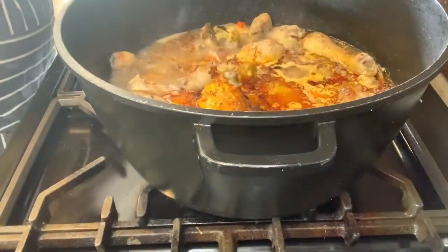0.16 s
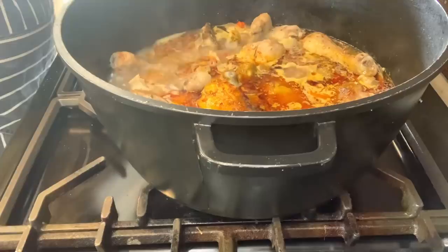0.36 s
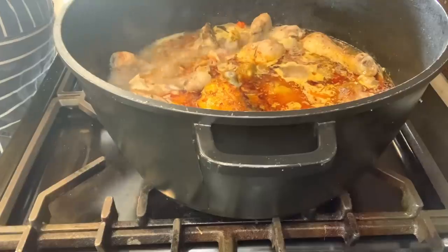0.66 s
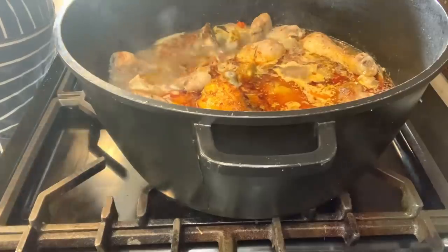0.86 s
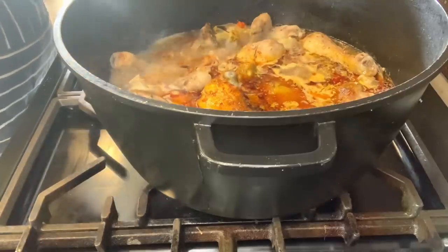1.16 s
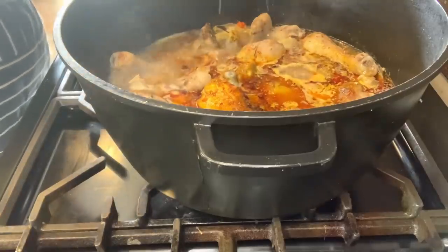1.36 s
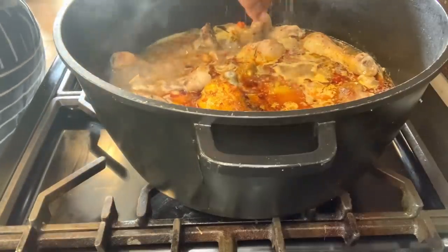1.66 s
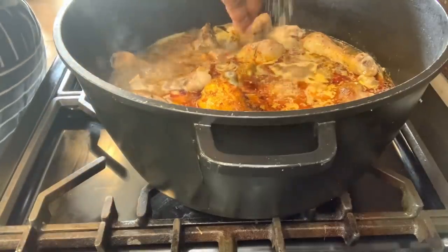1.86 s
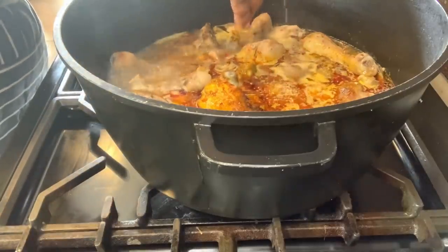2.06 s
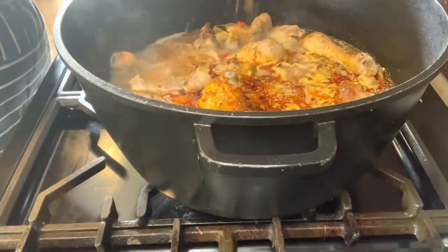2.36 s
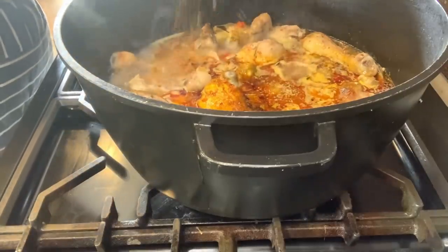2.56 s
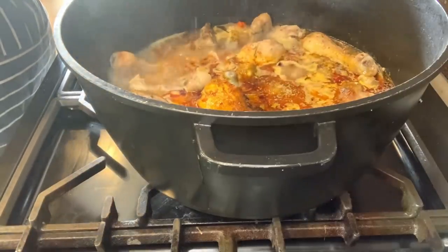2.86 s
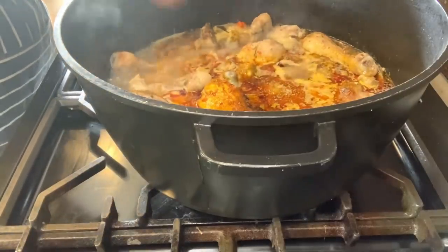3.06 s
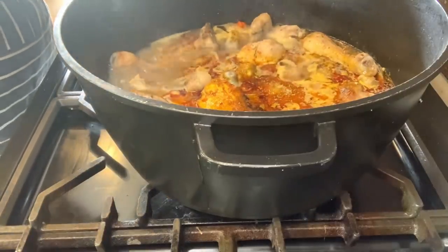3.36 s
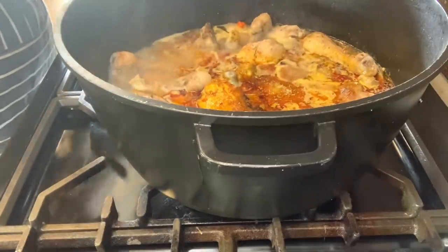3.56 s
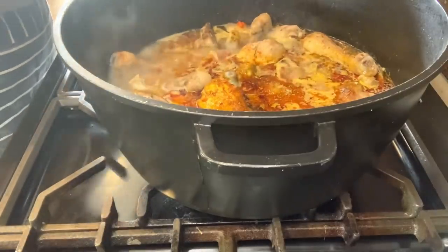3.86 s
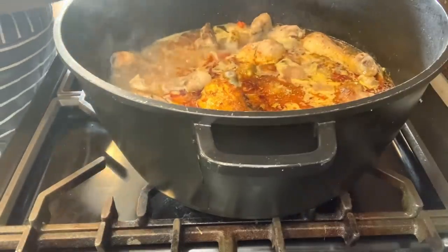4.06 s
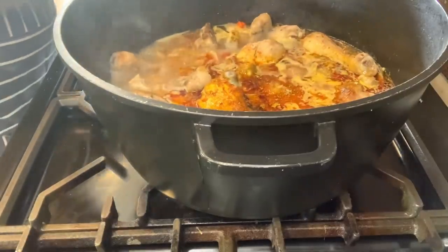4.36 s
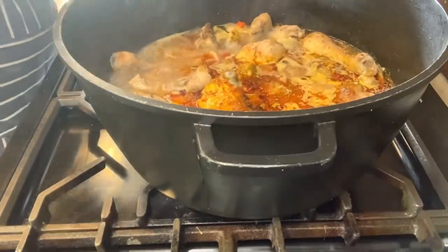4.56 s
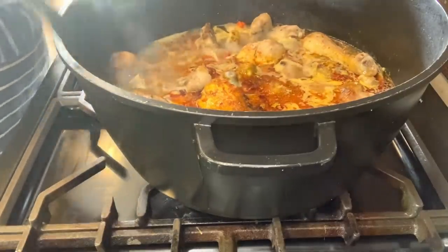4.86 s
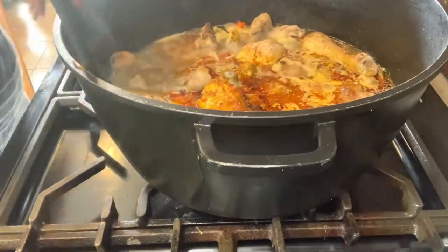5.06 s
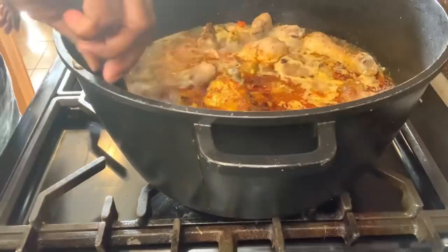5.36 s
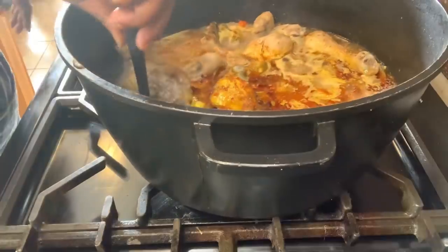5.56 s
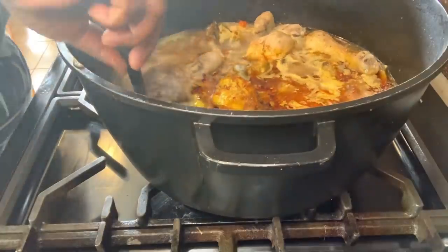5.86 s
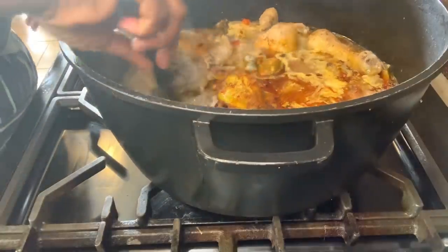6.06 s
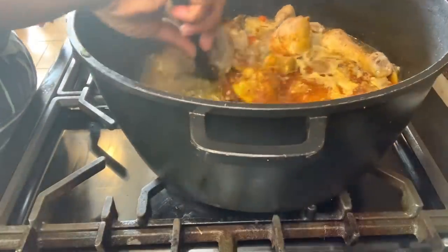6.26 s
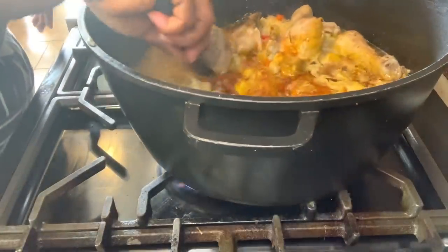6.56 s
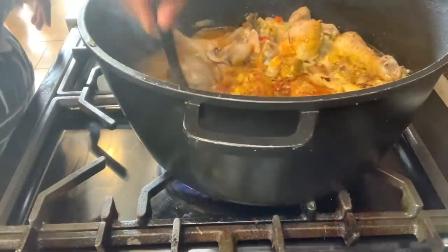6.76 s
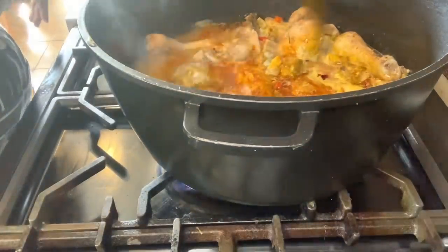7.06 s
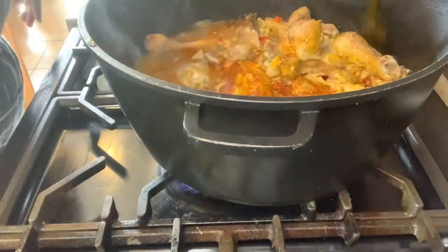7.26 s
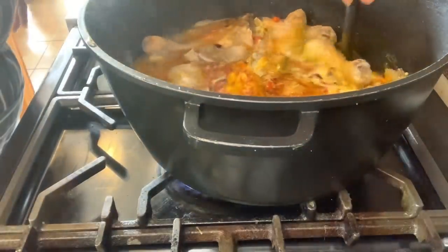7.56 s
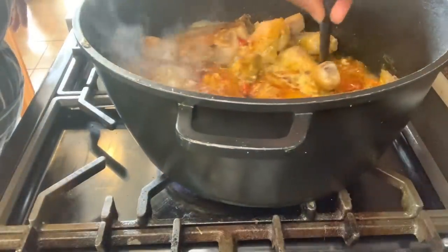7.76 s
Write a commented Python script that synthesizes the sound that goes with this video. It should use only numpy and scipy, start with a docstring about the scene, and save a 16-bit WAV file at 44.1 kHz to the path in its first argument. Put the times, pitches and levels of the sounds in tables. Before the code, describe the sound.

Close stereo pickup of a chicken stew simmering on a gas stove in a small kitchen. Flame hiss, low rumble and a faint steady hum run throughout, with tiny bubbles popping. Around the middle a jar is set down with a short dull clatter and bubbles thicken. Later a spoon ticks, drags dully through the stew, thuds softly and knocks the pot sharply, followed by a few light ticks.

```python
"""In a kitchen, a pot of soup simmers on a gas burner, close to a two-port microphone.
The gas jets are coloured noise, hissing over a low rumble; a hum and thin tones are wavering sines.
Bubbles are short rings that rise in pitch. A jar set down and a spoon knocking the pot ring many pitches.
The spoon also ticks, and scrapes through the stew as noisy slips; thuds are a few low cycles.
Rustles are grainy bursts, and the kitchen answers the jar, spoon, ticks and bubbles with an echo."""
import sys
import numpy as np
from scipy import signal
from scipy.io import wavfile
from scipy.ndimage import uniform_filter1d

SR = 44100
rng = np.random.default_rng(int(sys.argv[2]) if len(sys.argv) > 2 else 0)


def pcm_store(signal):
    """Save signal as 16-bit PCM."""
    levels = np.round(np.clip(np.atleast_2d(signal), -1, 1) * 32767)
    wavfile.write(sys.argv[1], SR, levels.astype(np.int16).T)


N = 348831  # length in samples


def amp(db):
    """Turns a level in dB into a gain."""
    return 10 ** (np.asarray(db) / 20)


def evened(x):
    """Scales a signal to an rms of 1."""
    return x / np.sqrt(np.mean(x ** 2) + 1e-20)


def read(points, hz):
    """Reads a table between its points, on a log-frequency axis."""
    f, value = np.transpose(points)
    return np.interp(np.log(hz + 1), np.log(f + 1), value)


def add(mix, s, sound, pan_db):
    """Places a sound in both ports at a time in s; pan is left minus right in dB."""
    part = mix[:, round(s * SR):][:, :sound.shape[-1]]
    part += amp([[pan_db / 2], [-pan_db / 2]]) * sound[..., :part.shape[1]]


def drift(rate_hz):
    """Slow random wander of rms 1: sines up to the given rate, the slower ones stronger."""
    t = np.arange(0, N, 64) / SR
    hz = np.geomspace(rate_hz / 20, rate_hz, num=24)[:, None]
    start = rng.random((24, 1))
    wander = (np.sin(2 * np.pi * (hz * t + start)) / np.sqrt(hz)).sum(0)
    return np.interp(np.arange(N) / SR, t, evened(wander))


def band(x, low_hz, high_hz):
    """Keeps one band of a sound, at rms 1."""
    edges = [low_hz, min(high_hz, SR / 2.1)]
    return evened(signal.sosfilt(signal.butter(2, edges, "band", fs=SR, output="sos"), x))


GRIT_ALIKE = 0.6  # likeness of click noise in the two ports, 0-1


def grit(count):
    """Noise for a click, only partly alike in the two ports."""
    a, b = rng.standard_normal((2, count))
    return np.array([a, GRIT_ALIKE * a + np.sqrt(1 - GRIT_ALIKE ** 2) * b])


# low rumble of the kitchen, alike in both ports: (f/Hz, level/dB per Hz)
RUMBLE_COLOUR = [(30, -100), (35, -74), (42, -66.5), (62, -70), (84, -74.5), (110, -70), (130, -66.5),
                 (142, -73), (170, -67), (186, -69.5), (208, -74), (222, -75), (238, -82.5), (262, -70.5),
                 (292, -70.5), (338, -82), (385, -80), (397, -91), (412, -75.5), (450, -93)]
# flame and gas jets before the stove's boost, the part alike in both ports: (f/Hz, level/dB per Hz)
HISS_ALIKE_COLOUR = [(330, -100), (450, -88), (1200, -89.5), (2200, -88.5), (3200, -94.5), (4200, -97),
                     (5500, -100), (6300, -92), (7600, -103.5), (8250, -132), (9500, -135), (10300, -99.5),
                     (10500, -95), (12500, -91.5), (13560, -91), (15700, -91)]
# the part of opposite sign in the two ports, before the boost: (f/Hz, level/dB per Hz)
HISS_OPPOSITE_COLOUR = [(30, -99), (120, -82), (400, -85.5), (1200, -90), (2200, -89.5), (3200, -94),
                        (4500, -97.5), (5500, -95), (6700, -92.5), (8000, -95), (9600, -93), (10400, -91),
                        (13000, -99), (13200, -135)]
# resonances of burner, pot and stove top: (f/Hz, width/Hz, boost/dB at blend 0, boost/dB at blend 1)
STOVE_RESONANCES = [(400, 37, 0.5, 5.5), (690, 110, 0.5, 3), (883, 91, 2.9, 4.5), (988, 18, 3.5, 9.5),
                    (1530, 168, 5.6, 5.5), (1642, 74, 3.1, 5.5), (1728, 35, 5.5, 5.5), (2150, 61, 3.3, 2),
                    (2840, 47, 4, 1.5), (3615, 70, 11, 6), (3658, 156, 5.5, 4), (3760, 90, 6, 6),
                    (4770, 440, 2.3, 3.5), (6990, 170, 11, 4.8), (7260, 300, 10, 9), (8680, 420, 14, 9),
                    (9200, 300, 8, 7), (9850, 450, 8, 7), (13180, 450, 9, 9), (14750, 350, 4, 4),
                    (13790, 280, 9, 10), (14230, 260, 3, 4)]
# the colour of the hiss shifts a little: (t/s, blend, held at 0.77 until 5.9 s)
COLOUR_BLEND = [(5.9, 0.77), (6.5, 1)]
# share of the opposite part that follows the alike part a quarter cycle late,
# as for sound from one side: (f/Hz, share, sign gives the side)
QUARTER_LATE = [(80, 0.47), (200, 0.44), (380, .5), (600, 0.48), (1150, .3), (1400, -.1), (1650, -.5),
                (1900, -.1), (2300, -.45), (2900, 0), (3400, 0), (3650, .5), (4000, -.1), (5300, -.5),
                (6000, .07), (7200, -0.54), (10300, 0.0096), (11500, 0.29), (13000, -0.2)]
# depth of the drifting patches: (f/Hz, rms level/dB)
PATCH_DEPTH = [(250, 0), (600, 2), (3000, 2.5)]
# balance of the two ports: (f/Hz, left minus right level/dB)
PORT_BALANCE = [(60, 1), (110, -3), (200, 0.5), (300, 2.5), (550, -1.5), (1100, -1), (1650, -4.5),
                (2400, -1), (3650, -3), (5000, 0.5), (7000, 2)]


def flame():
    """Rumble and hiss: noise coloured by the stove, in drifting patches, split over the two ports."""
    hz, t, z = signal.stft(rng.standard_normal((2, N)), SR, nperseg=4096)
    blend = np.clip(np.interp(t, *np.transpose(COLOUR_BLEND)), 0, 1)
    boost_db = np.zeros((len(hz), len(t)))
    for f, width, db_at_0, db_at_1 in STOVE_RESONANCES:
        peak = 1 / (1 + ((hz - f) / (width / 2)) ** 2)
        boost_db += np.outer(peak, db_at_0 + blend * (db_at_1 - db_at_0))

    rumble_end = np.clip(1 - (hz - 450) / 100, 0, 1)  # fades out from 450 to 550 Hz
    rumble = amp(read(RUMBLE_COLOUR, hz)) * rumble_end
    hiss = amp(read(HISS_ALIKE_COLOUR, hz)[:, None] + boost_db)
    alike = np.hypot(rumble[:, None], hiss)
    opposite = amp(read(HISS_OPPOSITE_COLOUR, hz)[:, None] + boost_db)

    patches = uniform_filter1d(rng.standard_normal(z.shape), size=2, axis=2)
    patches = evened(uniform_filter1d(patches, size=16, axis=1))
    patch_gain = amp(read(PATCH_DEPTH, hz)[:, None] * patches)

    late = np.clip(read(QUARTER_LATE, hz), -1, 1)[:, None]
    z = np.array([z[0], np.sqrt(1 - late ** 2) * z[1] - 1j * late * z[0]])
    ripple_db = evened(uniform_filter1d(rng.standard_normal((2, len(hz), 1)), size=6, axis=1))
    z = z * amp(ripple_db)  # standing echoes of the kitchen ripple the colour by about a dB

    mid, side = z * np.array([alike, opposite]) * patch_gain * np.sqrt(SR / 2)
    lean_db = read(PORT_BALANCE, hz) * (hz < 7500)  # even in the treble
    lean = amp(lean_db[:, None] / 2)
    both = np.array([(mid + side) * lean, (mid - side) / lean])
    ports = signal.istft(both, SR, nperseg=4096)[1][:, :N]
    return ports * amp(0.19 * drift(rate_hz=8.4))  # the flame flutters


HUM_HZ, HUM_DB = 299.4, -50  # middle pitch and rms level
HUM_PAN_DB, HUM_LAG = 4, 0.54  # left minus right; lag of the left port in radians


def hum():
    """A steady motor tone: a sine whose pitch and level waver a little."""
    turn = 2 * np.pi * np.cumsum(HUM_HZ + 0.71 * drift(rate_hz=4.01)) / SR
    level = np.sqrt(2) * amp(HUM_DB + 0.57 * drift(rate_hz=14))
    pan = amp([[HUM_PAN_DB / 2], [-HUM_PAN_DB / 2]])
    return level * pan * np.sin([turn - HUM_LAG, turn])


POT_PAN_DB = -3  # left minus right: the pot stands a little to the right
# low drone and faint whistle of the jets: (f/Hz, level/dB, wander/Hz)
JET_TONES = [(42.8, -56, 1.65), (3604, -70, 8.94)]


def tones():
    """Thin sines that wander in pitch and swell a little."""
    out = np.zeros((2, N))
    for hz, db, wander in JET_TONES:
        turn = 2 * np.pi * np.cumsum(hz + wander * drift(rate_hz=5)) / SR
        level = np.sqrt(2) * amp(db + 2.4 * drift(rate_hz=8))
        add(out, 0, level * np.sin(turn), POT_PAN_DB * (hz > 500))  # the drone stays central
    return out


def bubble(hz, cycles=5.8, glide=0.0055):
    """A bubble rings for a few cycles, rising in pitch as it opens."""
    u = np.arange(0, 30, hz / SR)  # time in cycles
    ring = np.sin(2 * np.pi * (u + glide * u ** 2 / 2))
    return ring * (1 - np.exp(-u / 1.15)) * np.exp(-u / (cycles / 2)) * 2


SMALL_BUBBLES_PER_S, SMALL_BUBBLES_DB = 70, -58.5  # average rate; level near the quietest
POT_WIDTH_DB = 8  # spread of the small bubbles' pan
# large bubbles bursting: (t/s, level/dB near the peak, f/Hz)
LARGE_BUBBLES = [(0.29, -42, 915), (1.184, -46, 805), (1.228, -39, 840), (1.943, -46, 826),
                 (2.012, -46, 982), (2.234, -44, 900), (2.926, -47, 820), (3.052, -45, 950),
                 (3.101, -40.5, 910), (3.119, -39, 960), (3.488, -47, 910), (3.941, -44, 720),
                 (4.046, -39, 850), (4.264, -44.5, 835), (4.342, -51, 856), (4.401, -40, 900),
                 (4.542, -44, 830), (4.567, -49, 900), (4.583, -37, 850), (4.68, -41, 940),
                 (4.782, -51, 800), (4.797, -42, 840), (4.951, -43, 950), (4.972, -45, 900),
                 (7.834, -41, 960)]


def simmer():
    """Bubbles burst in the pot: large ones at set moments, small ones at random."""
    out = np.zeros((2, N))
    for s, db, hz in LARGE_BUBBLES:
        add(out, s, amp(db) * bubble(hz), POT_PAN_DB)
    chance = rng.random((int(N / SR * 80), 5))  # 80 candidates a second
    kept = chance[chance[:, 4] < SMALL_BUBBLES_PER_S / 80]
    for when, size, pitch, side, _ in kept:
        db = SMALL_BUBBLES_DB - 4.64 * np.log(size + 0.061)  # few are loud
        pan_db = POT_PAN_DB + POT_WIDTH_DB * (side - 0.5)
        add(out, when * N / SR, amp(db) * bubble(720 * 1.6 ** pitch), pan_db)
    return out


# light ticks of the spoon and of splashes: (t/s, click level/dB, f/Hz, ring against click level/dB)
LIGHT_TICKS = [(0.138, -30, 2490, -18), (5.1965, -34, 2190, 10), (5.237, -52, 2210, -2),
               (6.1582, -44, 1950, 24), (6.1675, -52, 2600, -10), (6.1741, -48, 2600, -10),
               (6.179, -47, 2500, 7), (6.1875, -35, 1880, 10), (6.1955, -45, 2400, -10),
               (6.583, -32, 1130, -4), (7.3727, -28.5, 1280, -12), (7.3763, -35, 1500, -10),
               (7.38, -40, 2600, -10), (7.48, -31.5, 4730, -12), (7.5475, -29.5, 1310, -4),
               (7.626, -40, 3280, 11)]


def ticks():
    """Each tick is a broad click with a short ring in it."""
    out, t = np.zeros((2, N)), np.arange(3000) / SR
    for s, db, hz, ring_db in LIGHT_TICKS:
        click = band(grit(len(t)), 0.35 * hz, 2.8 * hz) * np.exp(-t / 0.002)
        click = click / abs(click).max() * (1 - np.exp(-t / 0.0002))
        ring = amp(ring_db - 60 * t / 0.014) * np.sin(2 * np.pi * hz * t)
        ring = ring * (1 - np.exp(-t / 0.0037))  # the ring builds up more slowly
        add(out, s - 0.0005, amp(db) * (ring + click), POT_PAN_DB)
    return out


THUD_RISE = 1.3  # rise time as a share of the fall time
# soft thuds of pot, grate and counter: (t/s of the peak, peak level/dB, f/Hz, fall time in cycles)
SOFT_THUDS = [(1.82, -40.5, 62.7, 2.6), (4, -40.5, 71.5, 2.4), (4.089, -38, 263, 0.75),
              (4.107, -26, 173, 0.79), (4.131, -45, 170, 3.6), (4.167, -43, 196, 2.5),
              (4.782, -45, 61.5, 1.5), (4.883, -42, 159, 2), (4.888, -43, 334, 4.5),
              (4.936, -40, 74.6, 0.86), (6.048, -28.5, 91, 1.5), (6.097, -30.5, 100, 0.91),
              (6.448, -28, 71.5, 1.45), (6.5, -45, 74, 1.4), (6.545, -45, 71, 2), (6.6067, -30, 142, 1.25),
              (6.631, -35, 59, 1.7)]


def thuds():
    """A few low cycles that swell and die."""
    out, t = np.zeros((2, N)), np.arange(-4000, 8000) / SR
    for s, db, hz, cycles in SOFT_THUDS:
        fall = cycles / hz
        rise = THUD_RISE * fall
        shape = np.where(t < 0, np.exp(-(t / rise) ** 2), np.exp(-(t / fall) ** 0.64))
        add(out, s + t[0], amp(db) * shape * np.cos(2 * np.pi * hz * t), 0)
    return out


RUSTLE_SPAN = 1.165  # band edges as a ratio to the centre
# brief rustles of cloth and spoon: (t/s of the peak, level/dB, half length/s, centre f/Hz)
BRIEF_RUSTLES = [(3.644, -52, 0.046, 4800), (4.103, -42.5, 0.013, 4750), (5.23, -52.5, 0.053, 2650),
                 (6.178, -47.5, 0.021, 2830), (6.237, -50, 0.016, 1096), (6.38, -46, .014, 980),
                 (7.379, -46, 0.0084, 810)]


def rustles():
    """Grainy noise that swells and fades, unlike in the two ports."""
    out, t = np.zeros((2, N)), np.arange(-5000, 5000) / SR
    for s, db, half, hz in BRIEF_RUSTLES:
        sparse = rng.random(len(t)) < 3000 / SR  # about 3000 grains a second
        grains = band(rng.standard_normal((2, len(t))) * sparse, hz / RUSTLE_SPAN, hz * RUSTLE_SPAN)
        start = round(s * SR) - 5000
        out[:, start:start + len(t)] += amp(db) * grains * np.exp(-(t / half) ** 2)
    return out


MODE_LAG = 1.1  # largest phase shift of a mode in each port, in radians


def knock(blows, modes_hz, modes, crack_db, crack_hz, crack_s, pan_db):
    """Every blow rings the same modes with other strengths and adds a noisy crack."""
    out, t = np.zeros((2, N)), np.arange(12000) / SR
    hz = np.array(modes_hz)[:, None]
    mode_db, t60 = np.transpose(modes)[:, :, None]
    sign = (-1.) ** np.arange(len(hz))[:, None]  # neighbouring modes start in opposite directions
    for s, db in blows:
        spot_db = 2 * rng.standard_normal(hz.shape)  # each blow lands elsewhere
        # each mode faces the ports differently
        lag = MODE_LAG * rng.uniform(-1, 1, hz.shape) * np.array([1, -1])[:, None, None]
        fading = amp(mode_db + spot_db - 60 * t / t60)
        ring = (fading * np.sin(2 * np.pi * hz * t + lag) * sign).sum(1)
        crack = amp(crack_db) * band(grit(len(t)), *crack_hz) * np.exp(-t / crack_s)
        add(out, s, amp(db) * (ring + crack) * (1 - np.exp(-t / 0.0001)), pan_db)
    return out


# contacts of the jar with the counter: (t/s, level/dB)
JAR_CONTACTS = [(4.0803, -28.5), (4.0858, -30.5), (4.0885, -32), (4.0918, -27), (4.1, -28.5),
                (4.1068, -31.5), (4.111, -34.5), (4.116, -41), (4.129, -47), (4.146, -41), (4.165, -44),
                (4.18, -47)]
# pitches of jar and counter: (f/Hz)
JAR_PITCHES = [330, 520, 894, 996, 1130, 1324, 1650, 2050, 2891]
# ring at those pitches: (level/dB, time to fall 60 dB/s)
JAR_RING = [(-12, 0.021), (-8.5, 0.02), (1, 0.027), (1.8, 0.018), (0, 0.031), (-2, 0.033), (-10.5, 0.022),
            (-13, 0.025), (-15, 0.024)]


def jar_set_down():
    """Quick contacts ring the short, well damped modes of jar and counter."""
    return knock(JAR_CONTACTS, JAR_PITCHES, JAR_RING,
                 crack_db=-10, crack_hz=(320, 4100), crack_s=0.0036, pan_db=1.0)


SCRAPE_HZ, SCRAPE_WIDTH_HZ = 355, 260  # pitch and width of the pot's dull resonance
# spoon dragged through the stew: (t/s, level/dB)
SCRAPE_LEVEL = [(5.979, -66), (6.03, -56.5), (6.17, -49.5), (6.24, -57), (6.29, -45.5), (6.41, -45),
                (6.46, -70)]


def scrape():
    """Uneven slips of the spoon excite a dull resonance of the full pot."""
    s, db = np.transpose(SCRAPE_LEVEL)
    t = np.arange(s[0], s[-1], 1 / SR)
    slips = rng.standard_normal(len(t)) * (rng.random(len(t)) < 5000 / SR)  # about 5000 a second
    turn = np.exp(2j * np.pi * SCRAPE_HZ * t)
    r = np.exp(-np.pi * SCRAPE_WIDTH_HZ / SR)
    ring = slips / turn  # moves the resonance down to 0 Hz
    for _ in range(2):
        ring = signal.lfilter([1], [1, -r], ring)
    ring = (turn * ring).real
    out = np.zeros((2, N))
    add(out, s[0], amp(np.interp(t, s, db)) * evened(ring), 1)
    return out


# contacts of the spoon with the pot: (t/s, level/dB)
SPOON_CONTACTS = [(6.5864, -29), (6.5878, -23.5), (6.5898, -26), (6.5925, -31), (6.595, -36), (6.5995, -34),
                  (6.612, -41), (6.617, -49)]
# pitches of spoon and pot: (f/Hz)
POT_PITCHES = [260, 520, 850, 1250, 1600, 2169, 2900, 3500, 3800, 4667, 6400]
# ring at those pitches: (level/dB, time to fall 60 dB/s)
POT_RING = [(-10.5, 0.059), (-5.5, 0.0093), (-6.5, 0.0091), (-3.5, 0.039), (-15, 0.0094), (-23, 0.01),
            (-2, 0.0088), (-0.5, 0.012), (-3, 0.013), (-4, .012), (-9, 0.018)]


def spoon_on_pot():
    """Quick contacts ring the modes of spoon and pot under a strong, bright crack."""
    return knock(SPOON_CONTACTS, POT_PITCHES, POT_RING,
                 crack_db=1.5, crack_hz=(620, 5600), crack_s=0.0019, pan_db=-4.0)


# how long the kitchen echoes: (f/Hz, time to fall 60 dB/s)
KITCHEN_DECAY = [(150, 0.38), (700, 0.18), (2000, 0.11), (5000, 0.24), (10000, 0.036)]


def kitchen(x):
    """Sparse taps of random sign, each band dying at its own speed, other taps for each port."""
    taps = np.zeros((2, SR // 2))
    at = np.arange(120, SR // 2 - 20, 20)
    at = at + rng.integers(0, 20, (2, len(at)))
    np.put_along_axis(taps, at, rng.choice([-1., 1.], at.shape), 1)
    hz, t, z = signal.stft(taps, SR, nperseg=256)
    fading = amp(-60 * t / read(KITCHEN_DECAY, hz)[:, None])
    tail = signal.istft(z * fading, SR, nperseg=256)[1]
    return signal.fftconvolve(x, tail / np.linalg.norm(tail[0]), axes=1)[:, :N]


def scene():
    """Steady bed, plus events with the echo of the kitchen; the jar stands further off than the pot."""
    jar = jar_set_down()
    pot = spoon_on_pot() + ticks() + simmer()
    near = jar + pot
    near = np.array([np.roll(near[0], shift=3), near[1]])  # the sound reaches the right port first
    sent = amp(-3.5) * jar + amp(-6.5) * pot  # the further jar echoes more
    echo = kitchen(sent.mean(axis=0, keepdims=True))
    bed = flame() + hum() + tones()
    return bed + near + echo + thuds() + scrape() + rustles()


EDGE_HZ = 15750  # upper band limit


def record(dry):
    """The microphone drops the deepest bass; then a steep filter cuts the highest treble."""
    dry = signal.sosfilt(signal.butter(4, 36, "high", fs=SR, output="sos"), dry)
    low_pass = signal.firwin(2047, EDGE_HZ, window=("kaiser", 9), fs=SR)
    return signal.oaconvolve(dry, low_pass[None], "same", axes=1)


dry = scene()
out = record(dry)
pcm_store(out)
```